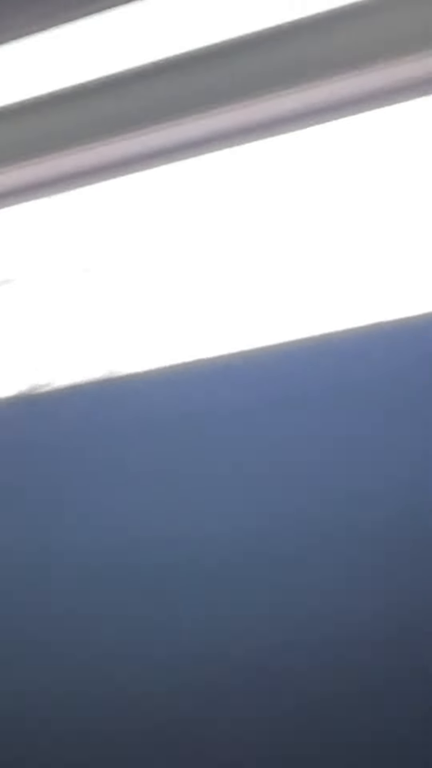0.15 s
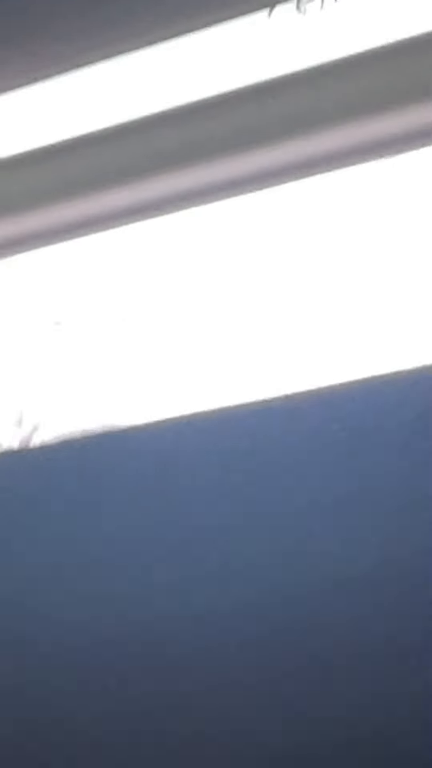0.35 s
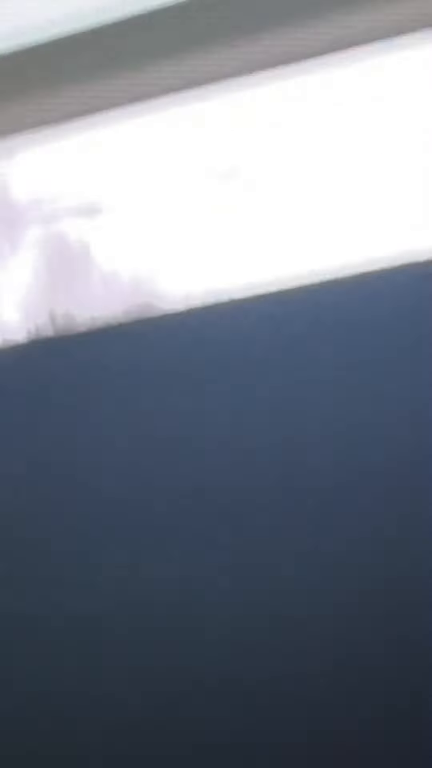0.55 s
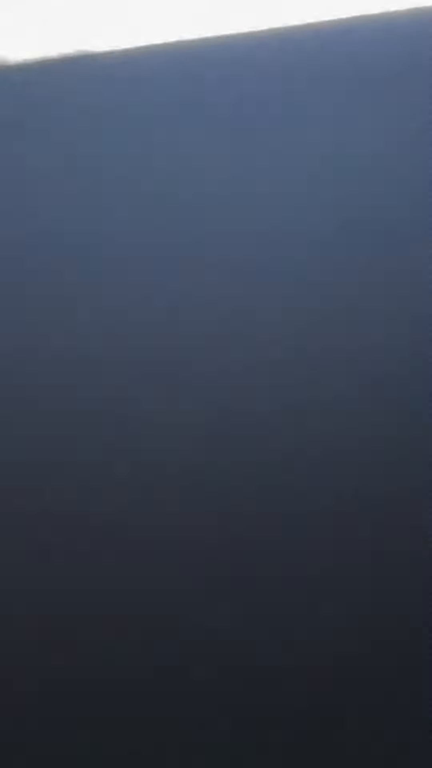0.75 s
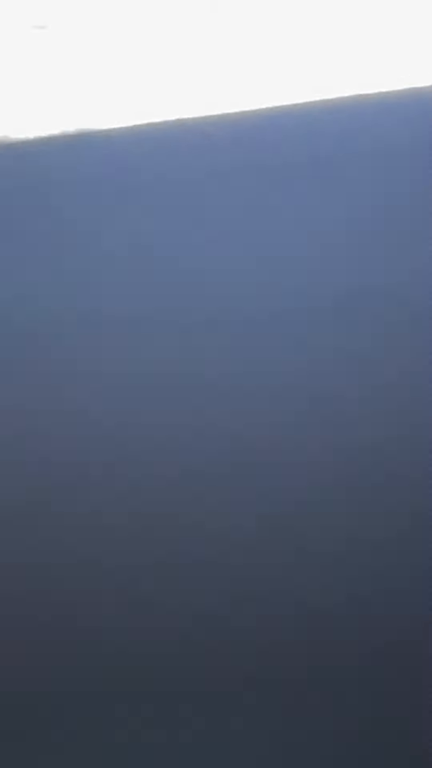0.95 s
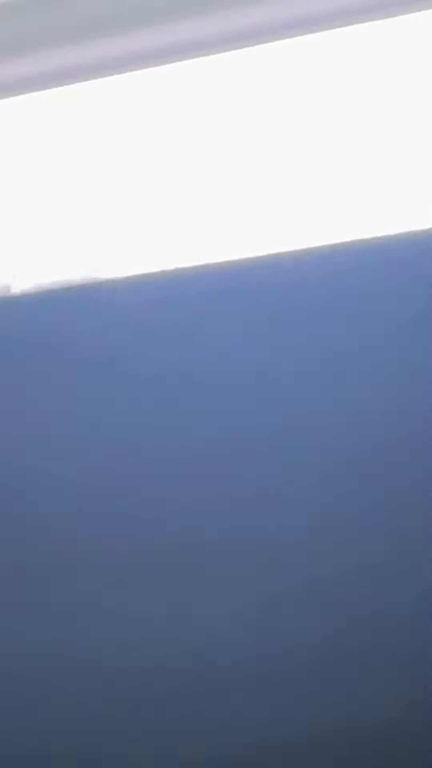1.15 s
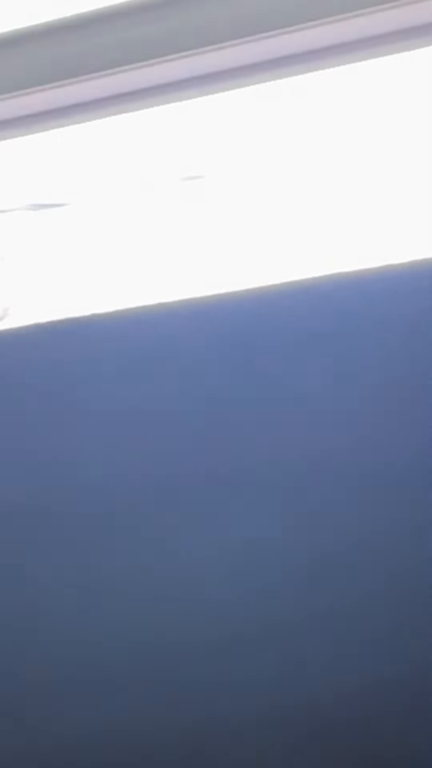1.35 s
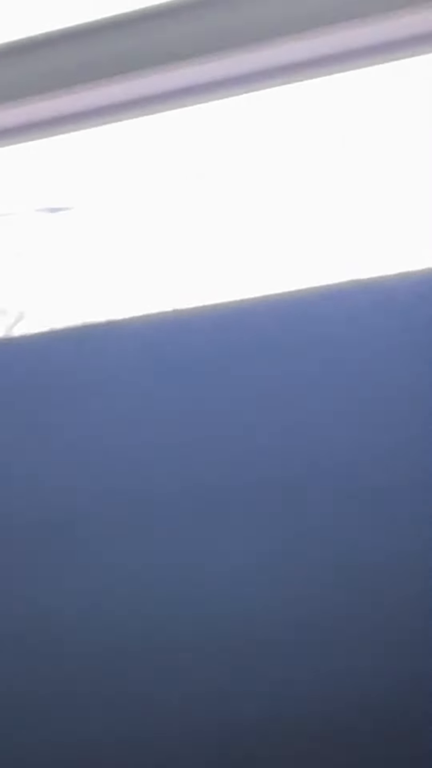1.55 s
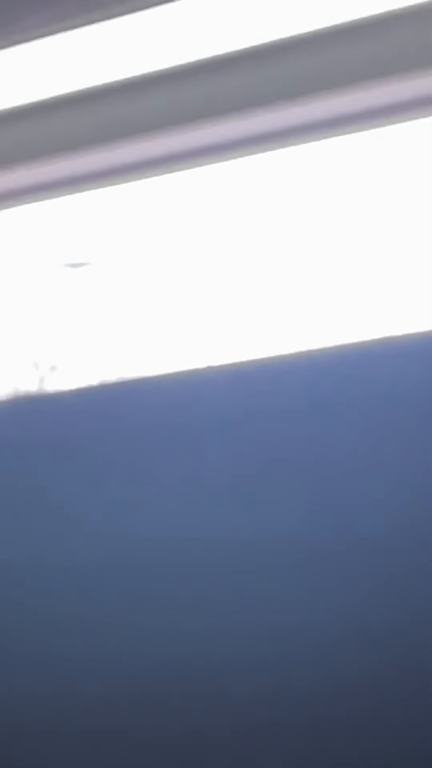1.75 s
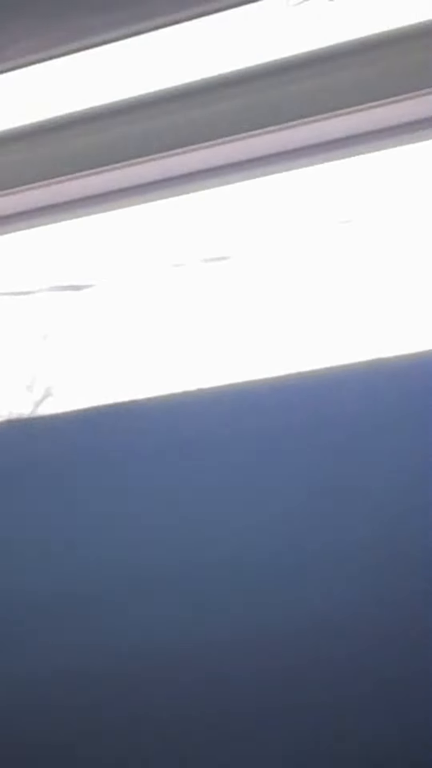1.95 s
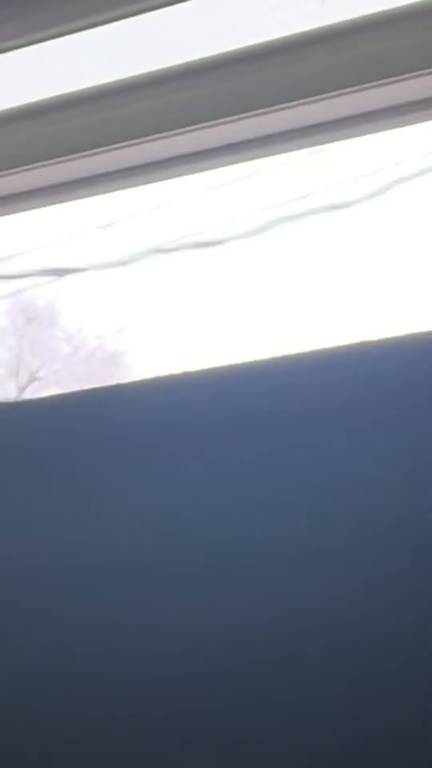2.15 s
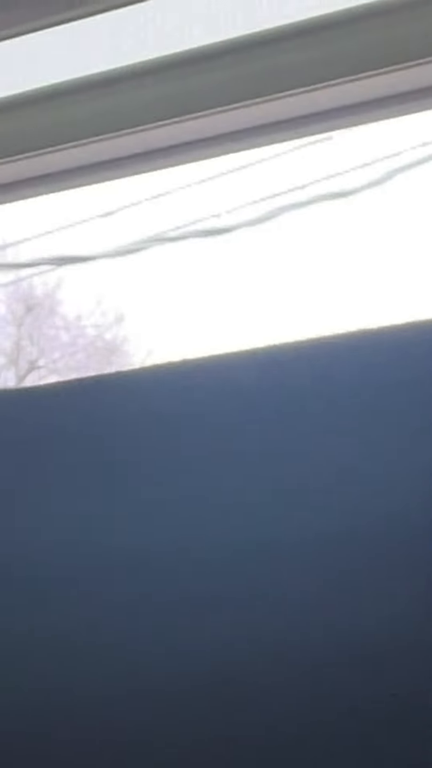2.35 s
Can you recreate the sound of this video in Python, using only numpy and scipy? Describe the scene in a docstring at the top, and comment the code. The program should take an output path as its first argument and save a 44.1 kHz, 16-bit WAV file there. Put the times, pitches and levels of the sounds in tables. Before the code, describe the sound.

Phone knocks hard once against a window frame, then a light tap and soft handling bumps

```python
"""A handheld phone crackles against the frame as it is moved about at a window in a quiet room.
Dispersed impulses make one knock and a lighter tap; undispersed clicks make the small ticks.
Short rubs are enveloped grains and noise, and short low tones make soft bumps.
The hand rumbles on the case as low noise that follows the grip, over a faint steady hiss of
coloured noise and a hum of fixed sines."""
import sys
import numpy as np
from scipy import signal
from scipy.fft import rfft, irfft
from scipy.io import wavfile

SR = 44100
rng = np.random.default_rng(int(sys.argv[2]) if len(sys.argv) > 2 else 0)


def log_audio(samples):
    """Write samples as a 16-bit WAV file to the path given in sys.argv[1]."""
    # one column per channel
    frames = np.atleast_2d(samples).T
    # limit to full scale, then quantise
    limited = np.clip(frames, -1, 1)
    pcm = np.round(limited * 32767).astype(np.int16)
    wavfile.write(sys.argv[1], SR, pcm)


N = 105840
T = np.arange(N) / SR  # time in s


def amp(db):
    """Level: amplitude grows tenfold every 20 dB."""
    return 10 ** (np.asarray(db) / 20)


def unit(x):
    """Power normalization: scales a signal to rms 1."""
    return x / np.sqrt(np.mean(x ** 2) + 1e-20)


def gains(colour, f):
    """Spectral envelope: dB values interpolated along a log-frequency axis."""
    at, db = np.transpose(colour)
    return amp(np.interp(np.log(f + 1), np.log(at), db))


def tint(x, colour):
    """Linear filtering: weights the spectrum by a colour, then sets rms 1."""
    f = np.fft.rfftfreq(N, 1 / SR)
    return unit(irfft(rfft(x) * gains(colour, f), N))


def noise(colour):
    """Stationary random noise: white noise shaped by a colour."""
    return tint(rng.standard_normal(N), colour)


def background():
    """Superposition: steady broadband hiss and a few faint pure tones."""
    # room hiss: frequency_hz, relative_db
    hiss_colour = [(15, -53), (30, -24), (60, -0.5), (200, -6.5), (300, -12.5), (500, -10), (830, -14),
                   (960, -7.5), (1060, -12.5), (1300, -7.5), (1500, -4), (1650, 2), (1900, -2.5),
                   (2300, -8.5), (2600, -20), (3100, -17.5), (3400, -16.5), (3750, -23.5), (5000, -27.5),
                   (7500, -35), (9700, -33), (12000, -39.5), (14200, -41), (15000, -56)]
    # steady tones: frequency_hz, rms_level_db
    tones = [(59.2, -78), (156.1, -76), (953, -85.5), (1626, -80.5), (1728, -80.5), (3332, -88),
             (3483, -88.5)]
    hiss_db = -64.5  # rms
    hum = 0
    for hz, db in tones:
        phase_turns = rng.random()
        hum = hum + amp(db) * np.sqrt(2) * np.sin(2 * np.pi * (hz * T + phase_turns))
    return amp(hiss_db) * noise(hiss_colour) + hum


def hand_rumble():
    """Amplitude modulation: low noise whose level follows the grip on the case."""
    # strength of the grip rumble: time_s, rms_level_db
    grip = [(0, -71), (.15, -66), (.26, -56), (.32, -71), (.37, -60), (.44, -66), (.5, -61), (.62, -64),
            (.72, -63.5), (.85, -63), (.95, -67.5), (1.08, -59), (1.22, -58.5), (1.42, -62), (1.52, -57),
            (1.75, -60.5), (1.96, -68), (2.06, -59), (2.4, -57.5)]
    # spectrum of the rumble: frequency_hz, relative_db
    grip_colour = [(15, -55), (26, -33), (38, -23), (60, 4), (85, -2), (120, -8), (160, -5), (240, -7.5),
                   (320, -15), (480, -25.5), (1000, -39), (3000, -63)]
    level_db = np.interp(T, *np.transpose(grip))
    return noise(grip_colour) * amp(level_db)


def rubs():
    """Stick-slip friction: sparse slips and smooth noise swell and die with each stroke."""
    # strokes: peak_s, rise_s, fall_s, body_db, scrape_db, rasp_db, hiss_db, fizz_db
    strokes = [(.038, 0.0081, 0.022, -73, -60.5, -81, -93, -85),
               (.122, .016, 0.024, -67, -54, -67.5, -81, -86),
               (.15, .01, 0.0064, -57.5, -55.5, -63.5, -80, -93),
               (0.205, 0.012, 0.0033, -53, -57, -54, -49, -59.5),
               (.25, 0.043, 0.044, -66, -75, -75, -72, -76),
               (0.334, .012, 0.018, -92, -79, -90, -77, -76.5),
               (.484, 0.0089, 0.022, -53, -41.5, -49, -66, -69),
               (.509, 0.012, 0.019, -50.5, -46.5, -53.5, -67.5, -69.5),
               (0.566, 0.024, 0.064, -61, -57, -63, -80, -85),
               (.995, 0.028, .04, -85, -75, -92, -71.5, -71.5),
               (1.125, 0.0042, 0.0045, -48.5, -46, -62, -68, -72),
               (1.135, 0.0054, 0.0062, -45, -48.5, -61.5, -63.5, -65.5),
               (1.15, 0.0055, 0.0061, -62, -61, -66, -61, -62.5),
               (1.163, 0.005, .008, -50, -52.5, -75, -65.5, -68),
               (1.195, 0.023, 0.034, -64.5, -60, -66, -69.5, -74.5),
               (1.43, 0.082, 0.067, -70.5, -71.5, -78, -74.5, -93),
               (1.55, 0.025, .04, -65.5, -69, -71, -71.5, -84.5),
               (1.476, 0.0037, 0.016, -57, -62, -80, -92, -91),
               (1.606, .016, 0.056, -63, -55, -68, -62, -89),
               (1.656, 0.016, 0.057, -62.5, -54, -76, -69, -90),
               (2.125, 0.013, .02, -66.5, -67.5, -69.5, -78.5, -93),
               (2.22, 0.065, 0.098, -67, -72.5, -81, -80, -92)]
    # low body of a rub: frequency_hz, relative_db
    body = [(60, -21), (150, 0), (340, -0.5), (520, -5.5), (800, -8), (1100, -18), (2500, -51)]
    # middle scrape: frequency_hz, relative_db
    scrape = [(150, -34), (450, -13.5), (700, -5.5), (830, 1.5), (970, 4), (1230, -5), (1450, 1.5),
              (1650, 1.5), (2100, -18.5), (3300, -31), (6000, -48), (16000, -59)]
    # upper-middle rasp: frequency_hz, relative_db
    rasp = [(700, -34), (1400, -1.5), (1750, 4), (2130, -8), (2400, 2), (2800, -8), (3400, -16),
            (5000, -28), (12000, -31)]
    # treble hiss: frequency_hz, relative_db
    hiss = [(500, -15), (2000, -7.5), (3500, -5.5), (4400, 0.5), (5000, -0.5), (6200, -4), (7300, -13.5),
            (9000, -12), (11500, -24.5), (16000, -37)]
    # highest fizz: frequency_hz, relative_db
    fizz = [(2000, -30), (5000, -28), (7000, -1.5), (9500, 5), (11000, 5), (13500, 8), (15000, -3),
            (16000, -16)]
    slips_per_s, slip_power_share = 1300, 0.53
    slip_spread_db = 3  # mean of the exponential spread before its cap at three times this

    spread = np.minimum(rng.exponential(1, N), 3)
    sizes = (rng.random(N) < slips_per_s / SR) * amp(slip_spread_db * spread)
    out = np.zeros(N)
    for k, colour in enumerate([body, scrape, rasp, hiss, fizz]):
        power = np.zeros(N)  # overlapping strokes add in power
        for s, rise, fall, *levels in strokes:
            envelope = np.exp(-np.maximum((s - T) / rise, (T - s) / fall))
            power += (amp(levels[k]) * envelope) ** 2
        slips = unit(sizes * rng.choice([-1, 1], N))
        smooth = rng.standard_normal(N)
        friction = np.sqrt(slip_power_share) * slips + np.sqrt(1 - slip_power_share) * smooth
        out += np.sqrt(power) * tint(friction, colour)
    return out


def blow(s, db, lag, colour, tilt_db=0):
    """Bending-wave dispersion: with a lag, treble outruns bass in a stiff panel as a downward sweep."""
    size, lead = 8192, 128  # samples; the lead leaves room ahead of the impulse
    lag_power, lag_offset_hz, direct_hz = 1.12, 16, 2580  # the lag fades out above direct_hz
    f = np.fft.rfftfreq(size, 1 / SR)
    octaves = np.log2(np.maximum(f, 500) / 1000)  # the tilt is flat below 500 Hz
    gain = gains(colour, f) * amp(tilt_db * octaves)
    delay = lag * (1e3 / (f + lag_offset_hz)) ** lag_power / (1 + (f / direct_hz) ** 4)
    # phase is the integral of group delay over frequency
    turns = np.cumsum(delay) * f[1] + f * lead / SR
    pulse = irfft(gain * np.exp(-2j * np.pi * turns))
    pulse = pulse / abs(signal.hilbert(pulse)).max()  # envelope peak of 1
    return amp(db) * np.pad(pulse, (round(s * SR) - lead, N))[:N]


def ticks():
    """Impulse excitation: small undispersed clicks of the case, each with its own spectral tilt."""
    # clicks: time_s, peak_db, tilt_db_per_octave
    clicks = [(.1172, -49.5, -7), (.1582, -43, -10), (0.1707, -36.5, -3.5), (.1783, -45, -3),
              (.1836, -39, -2), (.1898, -53, -7), (.194, -43, -15), (.2005, -40, 3), (0.2103, -40, 3),
              (.2268, -53, 6), (.2503, -52, 3), (.3265, -56, 3), (.335, -60, -1), (.451, -48, -12.5),
              (0.4817, -42, -10), (1.1063, -46.5, -12), (1.1357, -61, -2), (1.1669, -51, -8),
              (1.4612, -46, -9.5), (1.4722, -51, -5.5), (1.784, -47, -8.5), (2.128, -58, -4)]
    # shared click spectrum: frequency_hz, relative_db
    tick_colour = [(200, -19.5), (1500, -3), (4500, 4), (7000, -11.5), (10000, -2), (14000, -8.5),
                   (16000, -27)]
    return sum(blow(s, db, 0, tick_colour, tilt) for s, db, tilt in clicks)


def knock():
    """Structure-borne sound: one strong dispersed blow comes through the case."""
    # the blow: time_s, peak_db, approximate_lag_at_1_khz_s
    strike = (.2083, -13, 0.001313)
    # its spectrum: frequency_hz, relative_db
    knock_colour = [(15, -49), (35, -20), (65, -2), (110, 12), (180, 11.5), (400, 10.5), (560, 8),
                    (800, 14.5), (980, 13), (1150, 3), (1400, 3.5), (1700, 7), (2200, -9), (2600, -1.5),
                    (3700, -2.5), (5200, 3), (7200, -10), (9000, -8), (11700, -20.5), (13700, -14),
                    (16000, -27)]
    return blow(*strike, knock_colour)


def room(x):
    """Diffuse reverberation: convolution with exponentially decaying noise of unit energy."""
    t60_s, gap_s = 0.19, .002
    t = T[:SR // 2]
    decay = np.exp(-np.log(1000) * t / t60_s)  # 60 dB down at t60_s
    tail = rng.standard_normal(len(t)) * decay * (t > gap_s)
    return signal.fftconvolve(x, tail / np.linalg.norm(tail))[:N]


def tap():
    """Direct and reverberant fields: a lighter dispersed blow also sounds in the room."""
    # the blow: time_s, direct_peak_db, approximate_lag_at_1_khz_s
    strike = (.3509, -30, 0.000488)
    # its spectrum: frequency_hz, relative_db
    tap_colour = [(50, -50), (300, -23), (700, -7), (1150, 1), (2000, 1.5), (2850, -13.5), (3800, -1.5),
                  (5000, -8), (7000, -23.5), (10000, -37), (13000, -30), (16000, -46)]
    room_db = -10  # gain of the room's response
    direct = blow(*strike, tap_colour)
    return direct + amp(room_db) * room(direct)


def bump(s, rise, hold, decay, hz, sag, db):
    """Damped oscillation: the case shudders at a low pitch that may glide, then dies away."""
    t = np.maximum(T - s, 0)
    level = np.minimum(t / rise, 1) * np.exp(-np.maximum(t - rise - hold, 0) / decay)
    pitch_hz = (t > 0) * hz * 2 ** (-sag * t)
    return amp(db) * level * np.sin(2 * np.pi * np.cumsum(pitch_hz) / SR)


def bumps():
    """Superposition: the soft bumps of the case add together."""
    # bumps: start_s, rise_s, hold_s, decay_time_s, pitch_hz, sag_octaves_per_s, level_db
    # a negative sag raises the pitch; decay time is the fall to 1/e
    soft_bumps = [(1.1272, 0.0039, 0.035, 0.0062, 115, 9, -36),
                  (1.182, 0.0037, 0.0096, 0.018, 77, 7.5, -44.5),
                  (.665, 0.0021, 0.0043, 0.0094, 133, 13, -49.5),
                  (0.705, 0.0088, 0.035, 0.029, 61.5, 2, -56),
                  (1.479, 0.0016, 0.0077, 0.0066, 116, 3, -46.5),
                  (1.506, 0.0028, 0.0056, 0.016, 112, 1, -48.5), (1.73, 0.0055, 0.021, .02, 68.4, 0, -54.5),
                  (2.038, .02, 0.13, .015, 58.7, 0, -55.5), (2.205, .004, .008, 0.0068, 129.3, -11, -47.5),
                  (2.35, .005, 0.036, .02, 170, 0.5, -53.5)]
    return sum(bump(*row) for row in soft_bumps)


def scene():
    """Linear superposition: all pressures add at one microphone."""
    mix = background() + hand_rumble() + rubs() + ticks() + knock() + tap() + bumps()
    return mix[None]


def record(dry):
    """Band limitation: a linear-phase low-pass filter is the recorder's upper limit."""
    edge_hz = 16000
    low_pass = signal.firwin(255, edge_hz, window=("kaiser", 9), fs=SR)
    return signal.oaconvolve(dry, low_pass[None], "same")


dry = scene()
out = record(dry)
log_audio(out)
```